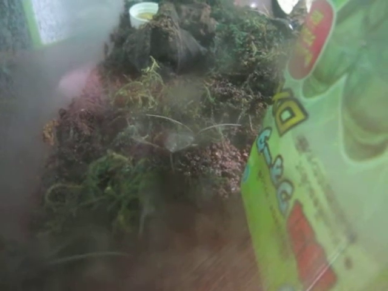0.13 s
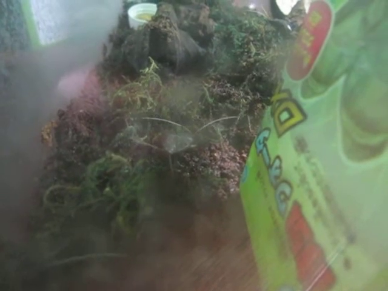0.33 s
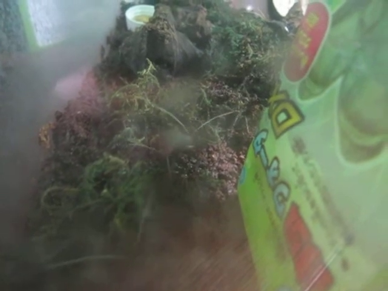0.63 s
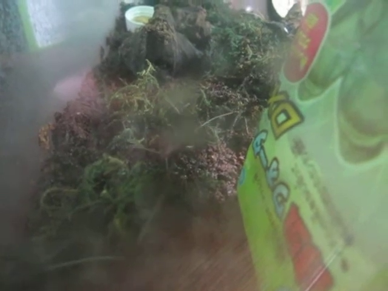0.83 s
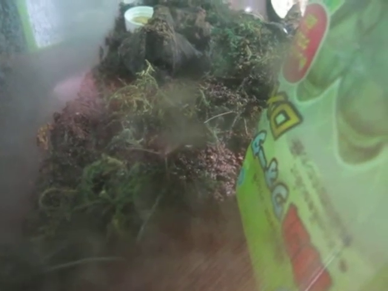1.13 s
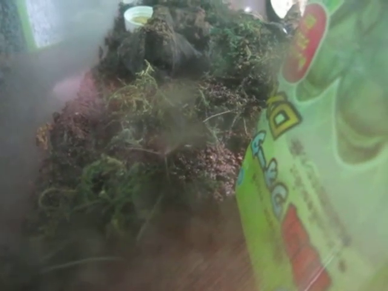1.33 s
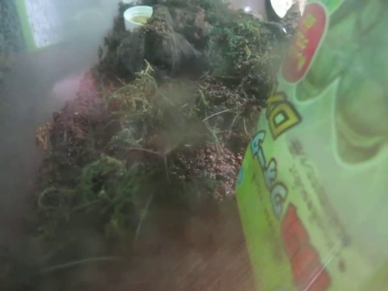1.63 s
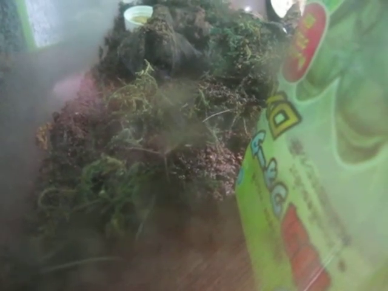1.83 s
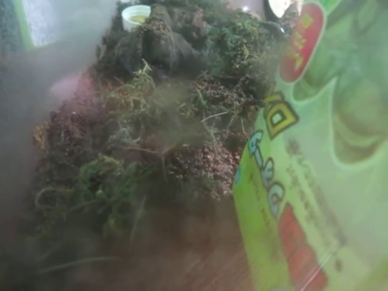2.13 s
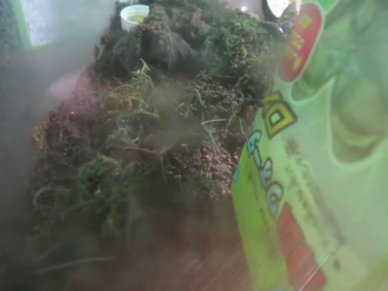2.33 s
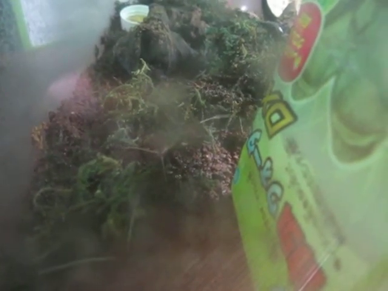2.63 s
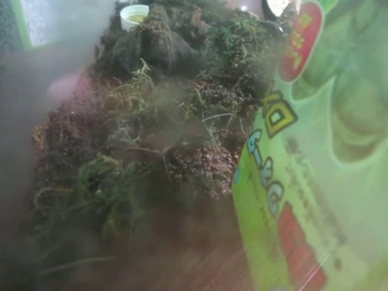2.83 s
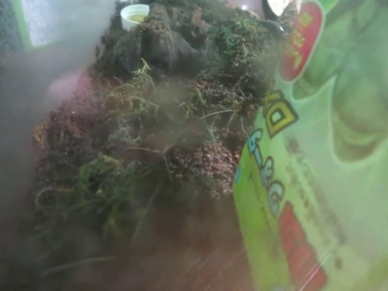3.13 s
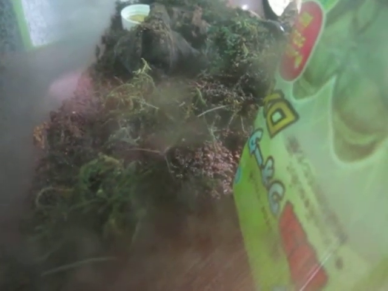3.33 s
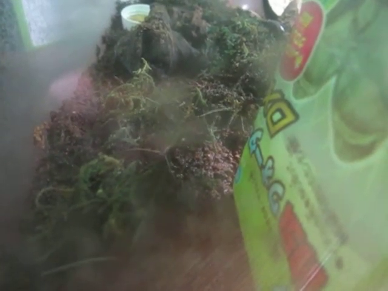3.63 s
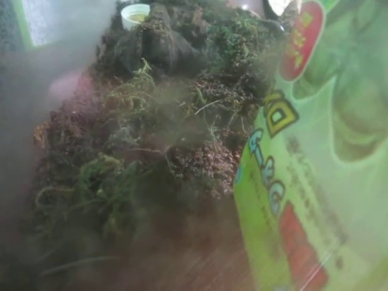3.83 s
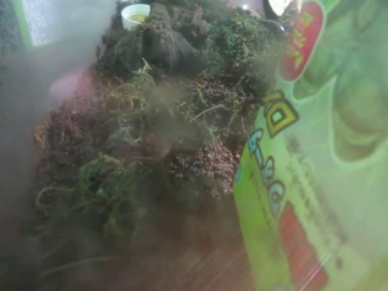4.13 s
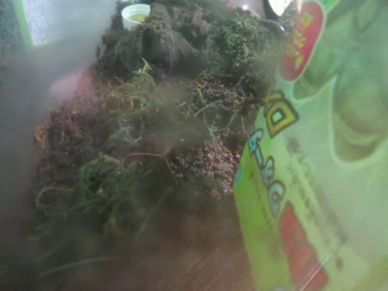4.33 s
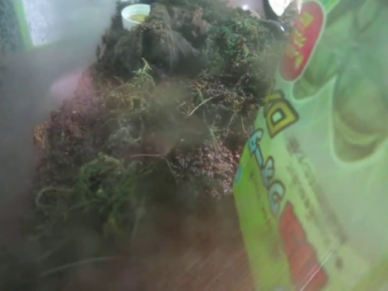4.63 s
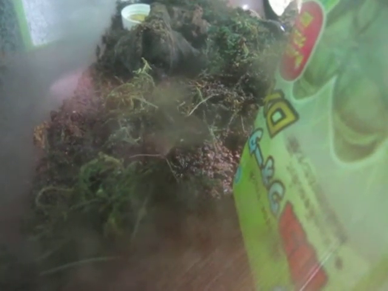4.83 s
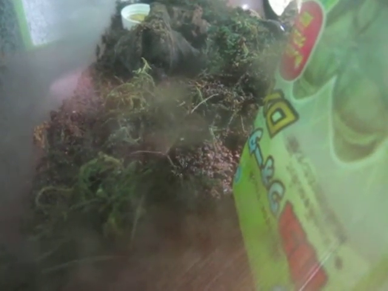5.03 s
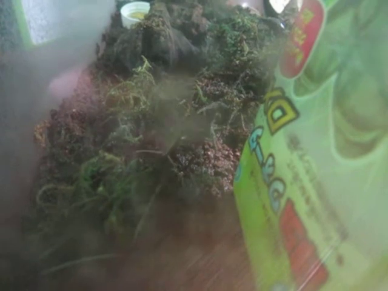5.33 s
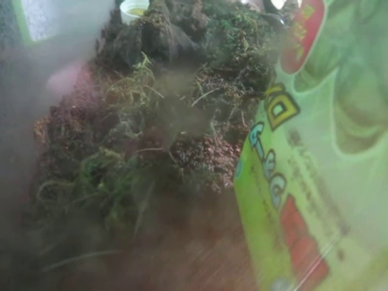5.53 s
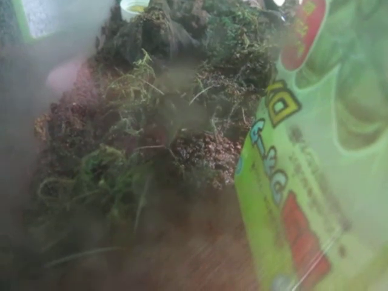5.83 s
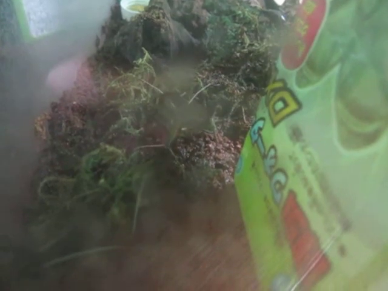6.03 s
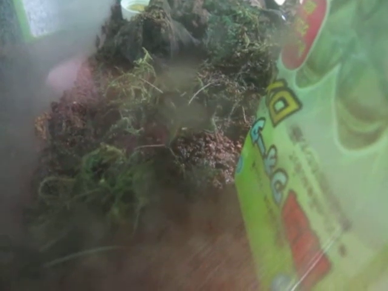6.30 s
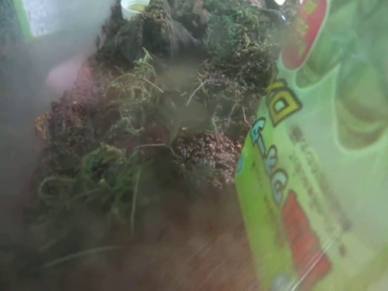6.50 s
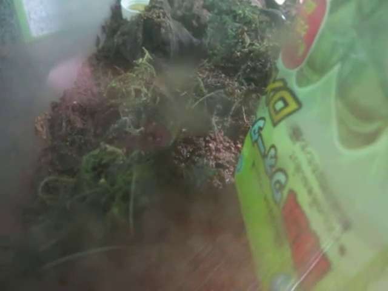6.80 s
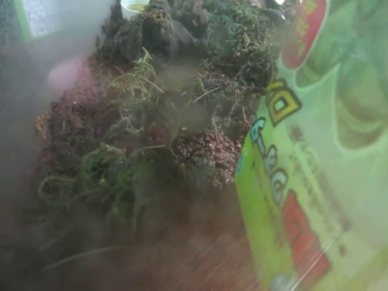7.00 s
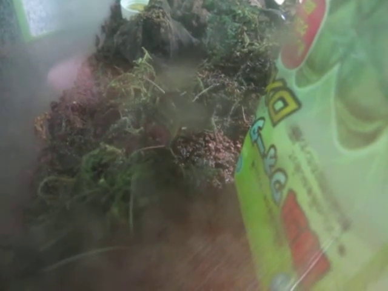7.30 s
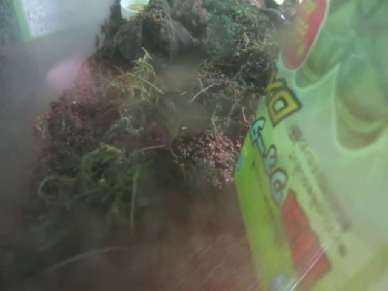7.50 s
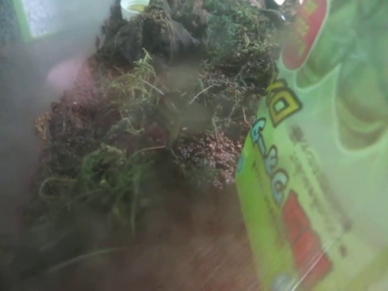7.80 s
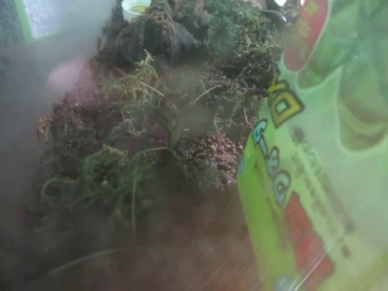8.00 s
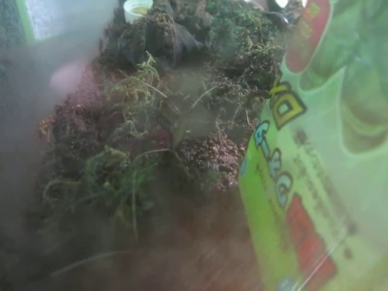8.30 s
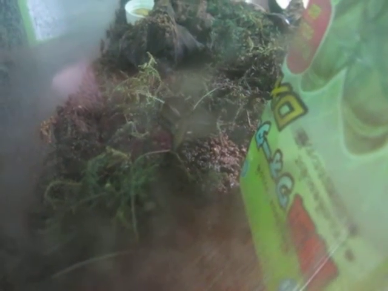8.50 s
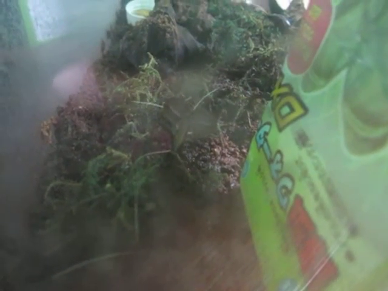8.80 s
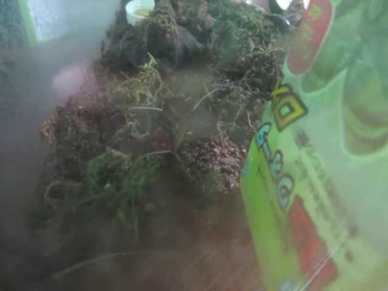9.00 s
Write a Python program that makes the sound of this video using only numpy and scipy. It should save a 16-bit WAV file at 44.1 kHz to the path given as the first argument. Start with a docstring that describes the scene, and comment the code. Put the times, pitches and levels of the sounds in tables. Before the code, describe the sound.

Over a constant background hiss, faint scraping wing strokes build into three clear, high trilling cricket chirps.

```python
"""A restless hiss and mains hum run throughout, dotted with small ticks and a few faint bumps.
From 2.5 s a bell cricket in a plastic case warms up with light strokes and dry brushing of its wings.
At 4.3, 5.5 and 7.1 s it sings three ringing chirps, each swelling fast and tiring into a soft tail.
Every stroke drags a scraper over a file, driving a wing resonance near 5 kHz; case and room echo it."""
import sys
import numpy as np
from scipy import signal
from scipy.fft import rfft, irfft, next_fast_len
from scipy.io import wavfile
from scipy.ndimage import uniform_filter1d

SR = 44100
rng = np.random.default_rng(int(sys.argv[2]) if len(sys.argv) > 2 else 0)


def transcribe(u):
    """Save the signal u as a 16-bit wav file named by the first command-line argument.

    u: samples, shape (n,) or (channels, n), limited to [-1, 1]; the rate is SR.
    q: integer samples, one column per channel.
    """
    v = np.clip(np.atleast_2d(u).T, -1, 1)
    q = np.round(v * 32767).astype(np.int16)
    wavfile.write(sys.argv[1], SR, q)


N = 403515
T = np.arange(N) / SR
EASY_HZ = 4869  # rate of tooth strikes in an effortless stroke

# pace of the wings, slowing before each chirp: time_s, strokes_per_s
STROKE_RATE = [(2.45, 48.05), (3.06, 51.18), (3.72, 49.3), (4.21, 45.11), (4.85, 50.87), (5.22, 45.74),
               (5.55, 45.36), (5.69, 48.14), (6.45, 48.78), (6.87, 41.75), (7.34, 46.66), (7.85, 48.26),
               (8.13, 45.52)]


def gain_of(db):
    """Decibels to amplitude."""
    return 10 ** (np.asarray(db) / 20)


def unit_rms(x):
    """Normalisation to an rms of one."""
    return x / np.sqrt(np.mean(x ** 2) + 1e-20)


def steadied(x, size=1830):
    """Normalisation to an rms of one over every few wing strokes."""
    return x / np.sqrt(abs(uniform_filter1d(uniform_filter1d(x ** 2, size), size)) + 1e-12)


def curves(rows):
    """Linear interpolation in time of each column after the first."""
    times, *columns = np.transpose(rows)
    return [np.interp(T, times, column) for column in columns]


def spectrum_db(points, hz):
    """Interpolation of a spectrum on a log-frequency axis."""
    point_hz, level_db = np.transpose(points)
    return np.interp(np.log(hz + 1), np.log(point_hz + 1), level_db)


def coloured(x, colour_db):
    """Spectral shaping by a function from Hz to dB, at unit rms."""
    size = next_fast_len(N)
    response = gain_of(colour_db(np.fft.rfftfreq(size, 1 / SR)))
    return unit_rms(irfft(rfft(x, size) * response, size)[:N])


def wander(rate_hz):
    """Random modulation of unit rms, lying mostly below rate_hz."""
    points = rng.standard_normal(N // 8)
    return unit_rms(np.interp(T * rate_hz * 2, np.arange(len(points)), points))


def ramp(x):
    """A share held between zero and one."""
    return np.clip(x, 0, 1)


def gate(start_s, length_s, attack_s, release_db_per_s):
    """Amplitude envelope: linear attack, hold, exponential decay."""
    release_db = -release_db_per_s * np.maximum(T - start_s - length_s, 0)
    return ramp((T - start_s) / attack_s) * gain_of(release_db)


def add(mix, start_s, sound):
    """Superposition of a sound on the mix, in place."""
    part = mix[round(start_s * SR):][:len(sound)]
    part += sound[:len(part)]


def resonate(x, hz, width_hz):
    """Forced response of a damped resonator with a peak gain near one."""
    radius = np.exp(-np.pi * width_hz / SR)
    return 2 * signal.lfilter([1 - radius], [1, -radius * np.exp(2j * np.pi * hz / SR)], x).real


def patchy(x, depth_db, size=512):
    """Amplitude modulation by band: each swells and fades for some tens of milliseconds."""
    spectra = signal.stft(x, nperseg=size)[2]
    patches = uniform_filter1d(rng.standard_normal(spectra.T.shape), size=8, axis=0)
    patches = unit_rms(uniform_filter1d(patches, size=4, axis=1))
    return unit_rms(signal.istft(spectra * gain_of(depth_db * patches.T), nperseg=size)[1][:N])


def hiss(flutter_db=0.99, grains_per_s=260, air_db=-55.0, air_follow=0.2):
    """Filtered noise: a fluttering, slightly grainy rush in fixed resonances, with a fine top."""
    # broad spectrum of the rush: frequency_hz, relative_db
    rush_spectrum = [(25, -10), (80, -7), (150, -4.5), (230, -2), (330, -4.5), (450, -6), (620, -7.5),
                     (800, -0.5), (1900, 2.5), (2250, 0), (2720, -1), (3050, -9.5), (3700, -16),
                     (4500, -12)]
    # its resonances and notches: centre_hz, width_hz, lift_db
    resonances = [(777, 5.7, 9), (899, 68, 8), (1028, 11, -16), (1204, 15, 6.5), (1320, 70, -3),
                  (1355, 5.3, 8.5), (1507, 8.2, 9.5), (1556, 59, -9), (1670, 30, -1), (1970, 57, 0.5),
                  (2045, 44, 8), (2216, 89, -5), (2275, 6.8, 8), (2410, 6.7, 13), (2456, 19, 6)]
    # spectrum of the fine top: frequency_hz, relative_db
    air_spectrum = [(3000, -6.5), (4400, 3), (5300, -2.5), (7000, -1), (8000, -3), (9300, -2.5),
                    (9900, -7.5), (13500, -8), (15700, -13)]
    # slow swell of the rush: time_s, relative_db
    swell = [(0.03, -45), (0.31, -43.5), (0.39, -44.5), (1.03, -41.5), (1.31, -45.5), (1.63, -42),
             (1.67, -46), (1.91, -42.5), (2.19, -45.5), (2.87, -42.5), (3.19, -43), (3.27, -40.5),
             (3.43, -48), (3.47, -44.5), (3.75, -42.5), (4.39, -44.5), (4.59, -41), (5.03, -44),
             (5.07, -42.5), (5.67, -45), (6.11, -43.0), (7.67, -43.5), (9.03, -42.0), (9.11, -45.5)]

    def colour_db(hz):
        peaks = sum(db / (1 + (2 * (hz - centre) / width) ** 2) for centre, width, db in resonances)
        return spectrum_db(rush_spectrum, hz) + peaks - 10 * np.log10(1 + (hz / 4300) ** 14)

    swell_db, = curves(swell)
    mean_db = swell_db.mean()
    grains = unit_rms((rng.random(N) < grains_per_s / SR) * rng.standard_normal(N))
    noise = patchy(rng.standard_normal(N) + gain_of(-10) * grains, depth_db=1.87)
    body = coloured(noise, colour_db)
    low = signal.sosfiltfilt(signal.butter(3, 900, fs=SR, output="sos"), body)  # this part stays level
    moving_db = swell_db - mean_db + flutter_db * wander(22)
    rush = gain_of(mean_db + 0.63) * (low + (body - low) * gain_of(moving_db))
    air = coloured(rng.standard_normal(N) + gain_of(-12) * grains, lambda hz: spectrum_db(air_spectrum, hz))
    return rush + air * gain_of(air_db + air_follow * moving_db + 1.55 * wander(11))


def hum(waver=0.2):
    """The line spectrum of a mains appliance, wavering slightly in amplitude and phase."""
    # steady partials: frequency_hz, rms_db
    partials = [(58.8, -61), (119.9, -64), (240, -76), (330, -66), (359.7, -62)]
    out = np.zeros(N)
    for hz, db in partials:
        amplitude = np.sqrt(2) * gain_of(db) * (1 + waver * wander(1.7))
        out += amplitude * np.sin(2 * np.pi * (hz * T + rng.random()) + waver * wander(0.84))
    return out


def ticks():
    """Damped transients: exponentially decaying noise, passed twice through a resonance."""
    # ticks, rustles and bumps: start_s, peak_db, centre_hz, width_hz, decay_s
    bursts = [(.2, -30.5, 1710, 900, .04), (.66, -46, 7000, 3000, 0.022), (.873, -74, 9000, 5000, 0.013),
              (.93, -46, 4830, 300, 0.072), (1.564, -34, 1900, 800, 0.0088),
              (1.627, -31.5, 1330, 700, 0.0097), (1.951, -33, 1990, 700, 0.0099),
              (2.045, -32.5, 2510, 500, 0.017), (2.132, -33, 2060, 600, 0.013),
              (3.29, -48, 8300, 1800, .03), (3.401, -46, 102, 111, 0.017), (3.535, -40, 12300, 2500, .004),
              (3.557, -39, 11500, 2500, 0.0046), (3.616, -44, 12100, 6160, 0.0032),
              (3.738, -35, 1798, 1400, 0.0055), (3.822, -31, 770, 417, 0.012),
              (3.971, -43, 8660, 2000, .025), (4.15, -41, 172, 220, .012), (5.081, -31, 1504, 1160, 0.058),
              (6.15, -31, 1745, 1293, 0.051), (7.984, -34, 1800, 1210, 0.0062),
              (8.79, -33, 1770, 1000, 0.05)]
    out, t = np.zeros(N), T[:SR // 5]
    for start_s, peak_db, hz, width_hz, decay_s in bursts:
        burst = rng.standard_normal(len(t)) * np.exp(-t / decay_s)
        burst = resonate(resonate(burst, hz, width_hz), hz, width_hz)
        add(out, start_s, gain_of(peak_db) * burst / abs(burst).max())
    return out


def wing_drive():
    """Driving force of the song: pitch and grip of the scraper rise with effort, and so with level."""
    # light runs of strokes before and between the chirps: start_s, length_s, level_db, base_pitch_hz
    runs = [(2.509, .025, -58, 4820), (2.67, .065, -45, 4820), (2.774, .058, -45.5, 4820),
            (2.859, .2, -65, 4770), (3.445, 0.031, -46.5, 4815), (3.532, .035, -45, 4850),
            (3.594, .48, -45.5, 4910), (4.175, .14, -48.5, 4850), (5.209, .3, -43.5, 4885),
            (6.739, .34, -43, 4935)]
    # full chirps: start_s, firm_s, easing_s, length_s, peak_db, tail_db, end_db, lift_hz
    chirps = [(4.301, .41, .27, .83, -19, -34, -37.5, 124.9),
              (5.494, .51, 0.1167, 1.2, -17, -30, -33, 74.86),
              (7.065, .41, .30, 1.19, -17, -28.5, -33.5, 96.4)]
    attack_s, attack_from_db, tire_db_per_s, release_db_per_s = 0.086, -20.5, 8.5, 167.5
    lift_s, clean_s, settle_s, held_at_s, held_s = .12, .1, .11, 0.0845, 0.014
    run_slip, clean_slip, firm_slip = .8, .22, 0.94  # slip late in each stroke, 0-1
    easy_db, full_db, effort_hz, easy_grip, full_grip = -46, -18, 123.8, .26, .87
    loudest, pitch = np.full(N, gain_of(-130)), np.full(N, float(EASY_HZ))
    slip, held = np.full(N, run_slip), np.zeros(N)
    for start_s, length_s, db, hz in runs:
        run = gain_of(db) * gate(start_s, length_s, attack_s=0.013, release_db_per_s=400.5)
        pitch = np.where(run > loudest, hz, pitch)
        loudest = np.maximum(loudest, run)
    for start_s, firm_s, easing_s, length_s, peak_db, tail_db, end_db, lift_hz in chirps:
        t = T - start_s
        # a chirp swells quickly, tires slowly and dies away when the wings part
        tired_db = peak_db - tire_db_per_s * firm_s
        db = np.interp(t, [0, firm_s, firm_s + easing_s, length_s], [peak_db, tired_db, tail_db, end_db])
        db += attack_from_db * np.maximum(1 - t / attack_s, 0) ** 2
        chirp = gain_of(db - release_db_per_s * np.maximum(t - length_s, 0))
        # it opens on a clean, lifted note, whose last strokes run together before the scraper slips
        lift = lift_hz * ramp(2 * t / attack_s) * np.exp(-np.maximum(t - attack_s / 2, 0) / lift_s)
        held += ramp(2 - 2 * abs(t - held_at_s) / held_s)
        slipping = (t > clean_s) * (1 - ramp((t - firm_s) / settle_s))
        pitch = np.where(chirp > loudest, EASY_HZ + lift, pitch)
        slip = np.where(chirp > loudest, clean_slip + (firm_slip - clean_slip) * slipping, slip)
        loudest = np.maximum(loudest, chirp)
    level_db = 20 * np.log10(loudest)
    effort = ramp((level_db - easy_db) / (full_db - easy_db))
    grip = ramp(easy_grip + (full_grip - easy_grip) * effort ** 1.15)
    return level_db, pitch + effort_hz * effort ** 1.5, grip, slip * (1 - held), held


def cricket(light_span=0.24, firm_span=1.6, sag_hz=185, held_db=4, uneven_db=0.3):
    """Stridulation: each stroke plays the file, longer with a firm grip, flatter where it slips."""
    rate, = curves(STROKE_RATE)
    level_db, pitch, grip, slip, held = wing_drive()
    cycles = np.cumsum(rate * (T >= STROKE_RATE[0][0])) / SR + .14
    stroke = np.floor(cycles).astype(int) + 1
    strength, shift, catch, detune = rng.standard_normal((N // 400, 4))[stroke].T  # one draw a stroke
    span = np.clip(light_span + (firm_span - light_span) * grip ** 2, .05, 2)
    along = np.clip((cycles % 1 - .5 + 0.012 * shift) / span + .5, 0, 1)  # 0-1 along the file
    # pressure builds gently and lets go faster
    pressure = uniform_filter1d(np.abs(np.sin(np.pi * along ** 1.55)), size=80)
    contact_db = held_db * held + uneven_db * strength + 3.08 * slip * wander(250)
    contact = (pressure + held * (1 - pressure)) * gain_of(contact_db)
    sag = sag_hz * slip * (1 + np.tanh((along - .66) / 0.064)) / 2
    jitter = 35 * (0.47 + slip) * wander(300)
    tooth_hz = pitch - sag + (5 + 45 * (1 - grip) ** 4) * detune + jitter
    # a slipping scraper catches anew at every stroke; a firm one keeps the wing ringing in step
    jumps = uniform_filter1d(np.diff(stroke, prepend=0) * np.tanh(catch) * slip / 2, size=150)
    phase = 2 * np.pi * np.cumsum(tooth_hz / SR + jumps)
    ring = gain_of(level_db) * wing_ring(contact, phase, grip)
    return ring + file_rasp(pressure, level_db, pitch, grip, slip)


def wing_ring(contact, phase, grip, lead_s=0.0055):
    """Forced vibration: three harmonics of the tooth strikes each drive a resonance of the wing."""
    # wing resonances at the first, second and third partial: centre_hz, width_hz
    modes = [(4950, 183), (9920, 84), (14400, 350)]
    first = contact * np.sin(phase)
    # the overtones sound through the whole stroke, however light
    second, third = (np.sqrt(abs(contact)) * np.sin(k * phase) for k in (2, 3))
    # a light touch is mostly a tick, a firm one mostly the ring of the wing
    tick = (0.14 + 0.97 * (1 - grip) ** 3) * first
    fundamental = steadied(case(resonate(first, *modes[0]) + tick))
    # the octave speaks early in the stroke, before the ring has built up
    octave = steadied(np.roll(resonate(second, *modes[1]), -round(lead_s * SR)))
    twelfth = steadied(case(third + 2.4 * resonate(third, *modes[2])))
    return fundamental + octave * gain_of(-17 - 5 * grip) + twelfth * gain_of(-17.5 - 14.4 * grip)


def file_rasp(pressure, level_db, pitch, grip, slip, bite_db_per_hz=0.0248):
    """Friction noise: the scrape goes on between strokes and fades less than the ring."""
    # scraping spectrum of the file: frequency_hz, relative_db
    rasp_spectrum = [(3000, -24), (4350, -10.5), (4700, 14.5), (5550, 0.5), (5950, -7), (6250, -7),
                     (7000, -18.5), (9000, -18), (10400, -7.5), (10950, -13.5), (11600, -13.5),
                     (12000, -21), (12400, -16), (14000, -19), (15700, -20)]
    teeth = rng.standard_normal(N) * (pressure + .7) * gain_of(2 * wander(400))
    scrape = coloured(teeth, lambda hz: spectrum_db(rasp_spectrum, hz))
    bite_db = bite_db_per_hz * np.maximum(pitch - EASY_HZ, 0)
    return scrape * gain_of(-25.5 + 0.47 * level_db - 11.9 * grip + 3.1 * slip + bite_db)


def case(x):
    """Early reflection: the near plastic walls return each stroke as delayed, weaker copies."""
    # nearest reflections: delay_s, gain_db
    walls = [(.005238, -13), (.010363, -16)]
    out = x.copy()
    for delay_s, gain_db in walls:
        add(out, delay_s, gain_of(gain_db) * x)
    return out


def room(x, tail_t60_s=.5, early_t60_s=.07, early_db=1):
    """Reverberation: sparse reflections of random sign, a quick early cluster and a longer tail."""
    t = T[:SR // 2]
    taps = rng.choice([-1., 1.], len(t)) * (rng.random(len(t)) < .06) * (t > .006)
    taps *= gain_of(-60 * t / tail_t60_s) + gain_of(early_db - 60 * t / early_t60_s)
    return signal.fftconvolve(x, taps / np.linalg.norm(taps))[:N]


def brushing(hz=5420, width_hz=600):
    """Sliding friction: wings that brush without catching whisper in pulses at the stroke rate."""
    # spells of brushing: start_s, length_s, level_db
    spells = [(2.702, 0.47, -56.5), (3.353, 0.068, -54)]
    rate, = curves(STROKE_RATE)
    envelope = sum(gain_of(db) * gate(start_s, length_s, attack_s=0.088, release_db_per_s=435)
                   for start_s, length_s, db in spells)
    rub = rng.standard_normal(N) * (1 + 0.42 * np.cos(2 * np.pi * np.cumsum(rate) / SR))
    return unit_rms(resonate(resonate(rub, hz, width_hz), hz, width_hz)) * envelope


def scene():
    """Superposition of the background, the cricket and its echo in one channel."""
    song = gain_of(-0.06) * cricket() + brushing()
    echo = gain_of(-10) * room(song)
    return (song + echo + hiss() + hum() + ticks())[None]


def record(dry, ceiling_db=-10.5, cutoff_hz=15800):
    """Fast limiting rounds the tops of the loudest strokes; a low-pass filter then limits the band."""
    envelope = uniform_filter1d(abs(signal.hilbert(dry, next_fast_len(N))[:, :N]), size=40)
    limited = dry / (1 + (envelope / gain_of(ceiling_db)) ** 6) ** (1 / 6)
    low_pass = signal.firwin(511, cutoff_hz, window=("kaiser", 9), fs=SR)
    return signal.oaconvolve(limited, low_pass[None], "same")


dry = scene()
out = record(dry)
transcribe(out)
```